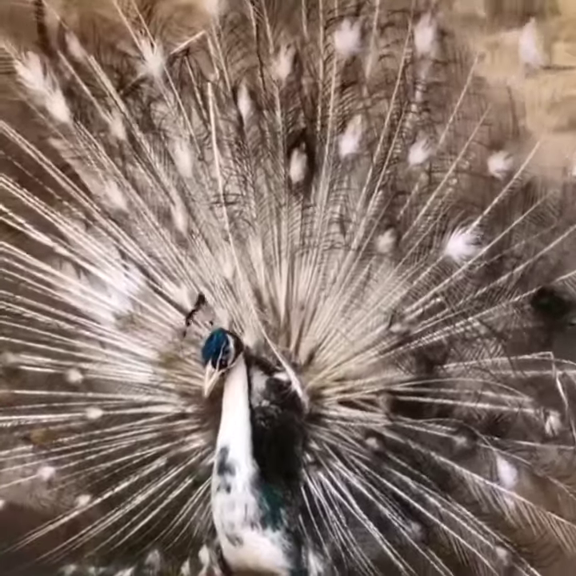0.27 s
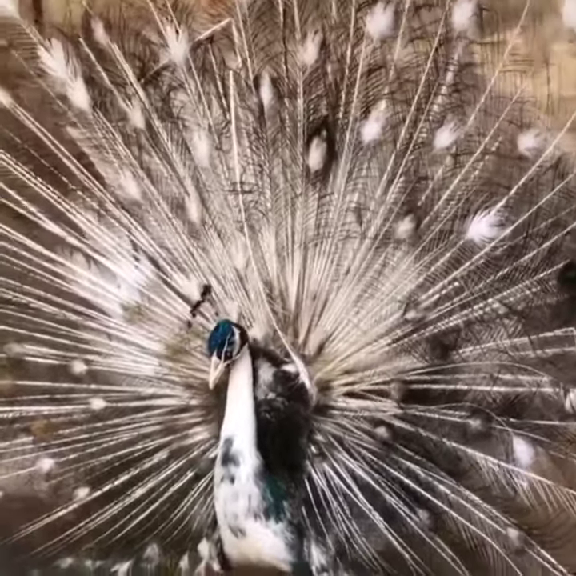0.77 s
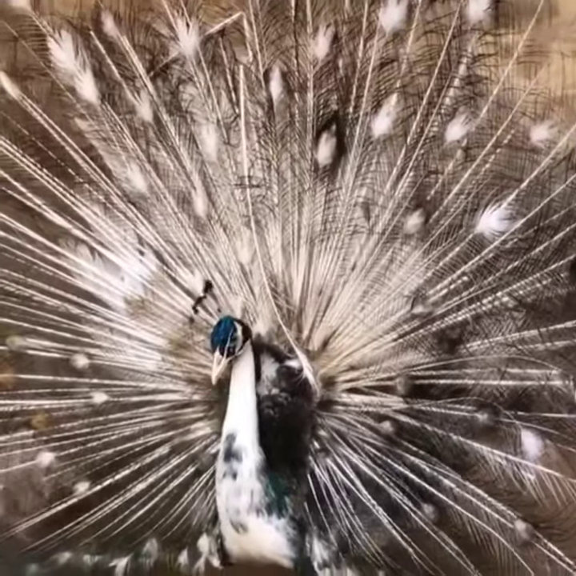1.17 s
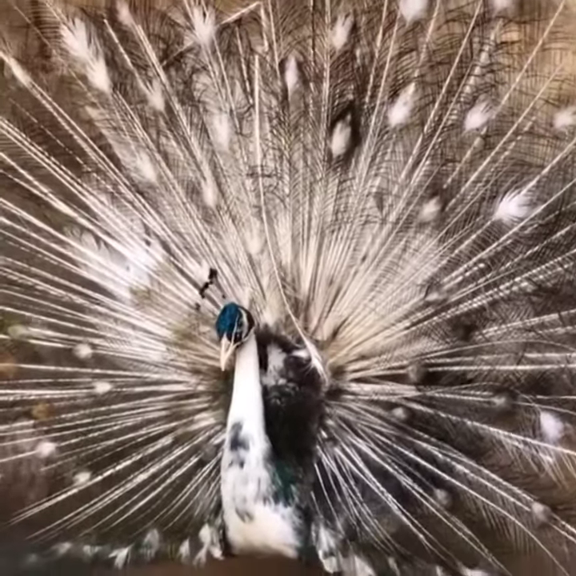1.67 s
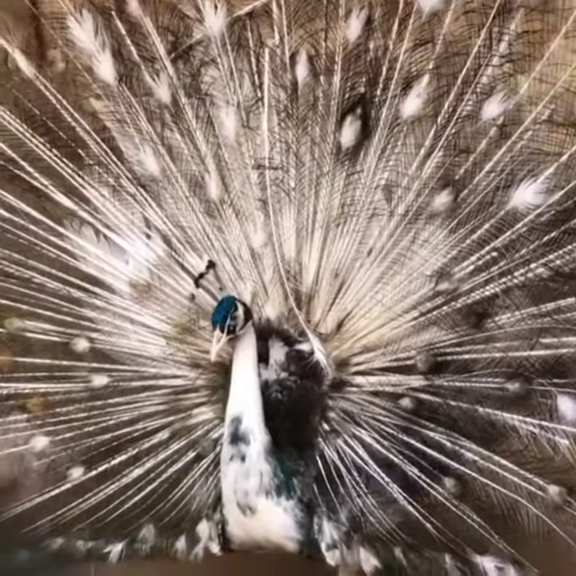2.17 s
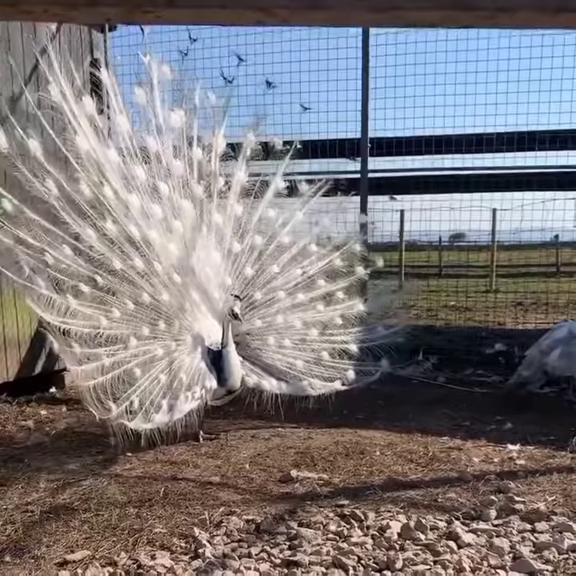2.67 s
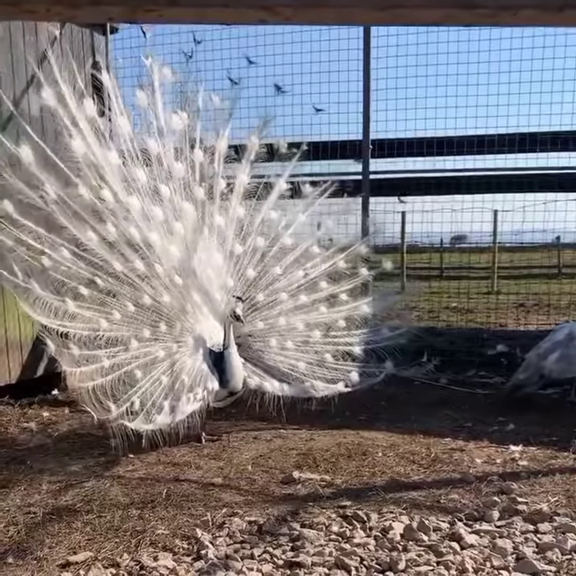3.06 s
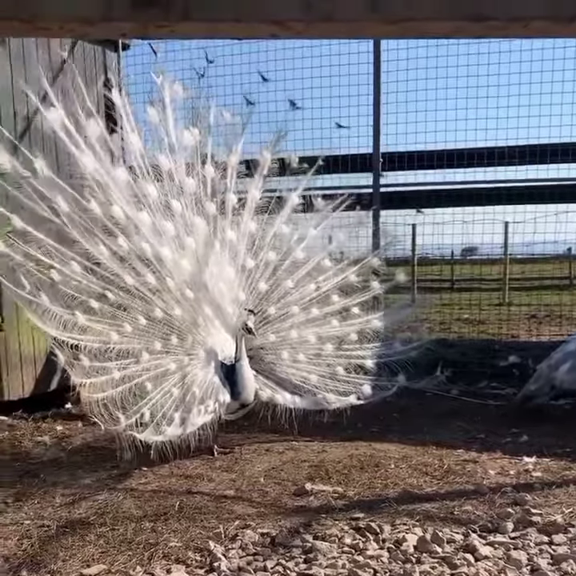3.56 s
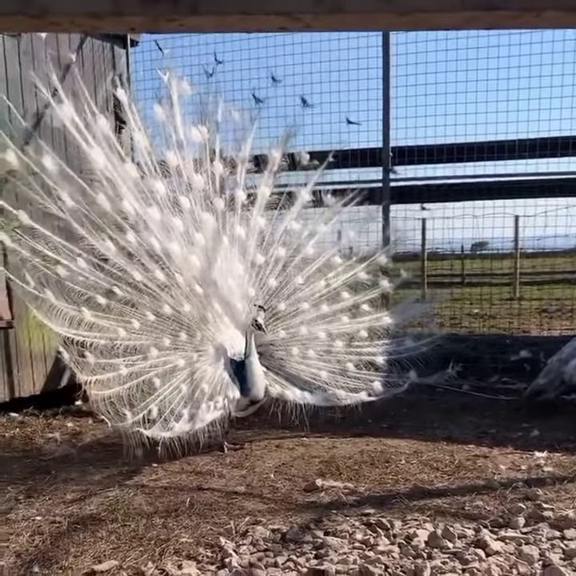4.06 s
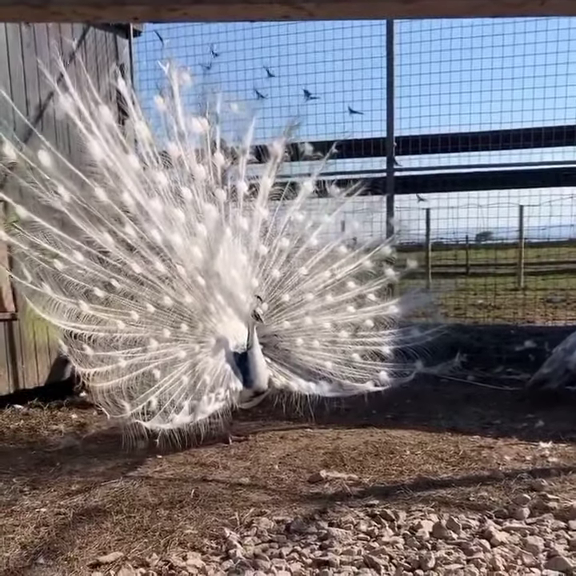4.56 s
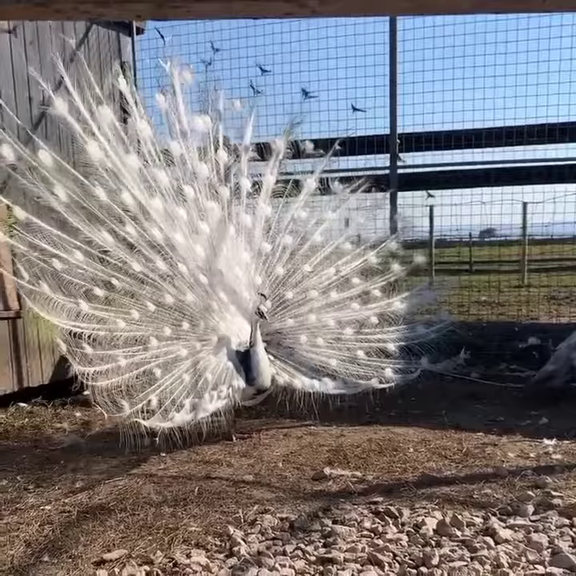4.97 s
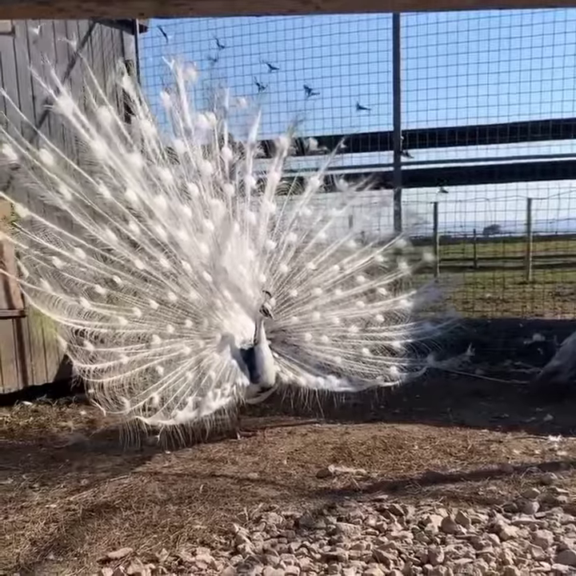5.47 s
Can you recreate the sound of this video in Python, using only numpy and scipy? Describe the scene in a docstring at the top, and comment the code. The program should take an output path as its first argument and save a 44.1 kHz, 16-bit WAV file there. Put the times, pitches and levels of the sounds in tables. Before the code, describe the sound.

First a busy mono bird yard: rough noise swelling, feathers shivering, honks and little twittering chirps with short echoes, a few thuds and ticks. An abrupt cut at about two and a half seconds brings a calmer stereo pen with soft wind, low hum and faint whistles. Fingers scuff and knock the handheld microphone, then peafowl wail, rising and falling with an echoing tail.

```python
"""Bird yard, two moments

A short silent gap joins them. First, in mono: wind rumble and yard noise, rustling feathers, thuds and a squawk
(all shaped noise), fowl honks (harmonics through a throat) and small birds (gliding sines). Then, in stereo and
quieter: a dying honk, a far motor hum (wavering lines), hands on the microphone (noise and ringing body modes)
and three peafowl meows, two syrinx voices through a long windpipe, that ring between the sheds."""
import sys
import numpy as np
from scipy import signal
from scipy.fft import rfft, irfft
from scipy.io import wavfile

SR = 44100
rng = np.random.default_rng(int(sys.argv[2]) if len(sys.argv) > 2 else 0)


def int16_out(signal):
    """Quantize to a 16-bit WAV file."""
    q = np.round(np.clip(np.atleast_2d(signal).T, -1, 1) * 32767)
    wavfile.write(sys.argv[1], SR, q.astype(np.int16))


N = 252252
T = np.arange(N) / SR
FIRST_END_S, SECOND_START_S = 2.4708, 2.4918


def from_db(db):
    """Decibels to an amplitude factor."""
    return 10 ** (np.asarray(db) / 20)


def rms_one(x):
    """Scale to an rms of 1."""
    return x / np.sqrt(np.mean(x ** 2) + 1e-20)


def in_time(rows, t=T):
    """Join the rows of a table by straight lines in time; one curve per column after the time."""
    times, *columns = np.transpose(rows)
    return [np.interp(t, times, column) for column in columns]


def at_hz(points, hz):
    """Read a (frequency, level) table on a logarithmic frequency axis."""
    table_hz, table_db = np.array(points).T
    return np.interp(np.log(np.maximum(hz, 1)), np.log(table_hz), table_db)


def coloured(x, points, turn=1):
    """Filter by a (frequency, level) spectrum; a complex turn rotates the phase."""
    gain = from_db(at_hz(points, np.fft.rfftfreq(N, 1 / SR)))
    return irfft(rfft(x) * turn * gain, N)


def noise(points):
    """Noise with the given spectrum, scaled to an rms of 1."""
    return rms_one(coloured(rng.standard_normal(N), points))


def drift(hz, size=N):
    """Random wandering of spread 1: noise through two equal low-pass poles at hz."""
    r = np.exp(-2 * np.pi * hz / SR)
    settled = signal.lfilter([1], [1, -2 * r, r * r], rng.standard_normal(size + 4000))[4000:]
    return rms_one(settled)


def add(out, s, sound):
    """Place a sound at s seconds."""
    i = round(s * SR)
    out[i:i + len(sound)] += sound[:N - i]


def bursts(rows, order=3):
    """Band-limited noise bursts that start fast and die exponentially."""
    out, t = np.zeros(N), T[:SR // 4]
    for s, level_db, low_hz, high_hz, t60 in rows:
        band = signal.butter(order, [low_hz, high_hz], "band", fs=SR, output="sos")
        burst = rms_one(signal.sosfilt(band, rng.standard_normal(len(t))))
        onset = np.clip(t / t60 / 0.11, 0, 1)
        add(out, s, from_db(level_db - 60 * t / t60) * burst * onset)
    return out


def swelling_mode(peak_db, hz, rise, sharpness):
    """A sine that swells to its peak after rise seconds, then dies; it first moves downwards."""
    t = T[:SR // 4]
    shape = (t / rise * np.exp(1 - t / rise)) ** sharpness
    return -from_db(peak_db) * shape * np.sin(2 * np.pi * hz * t)


# wind rumble spectra of the two moments: (frequency [Hz], relative level [dB per Hz])
RUMBLE_1 = [(8.8, -52), (15, -13), (48, 2.5), (67, -5), (107, -13.5), (180, -18), (269, -27), (400, -39),
            (520, -78), (880, -120)]
RUMBLE_2 = [(8.8, -63), (15, -38.5), (41, 2), (103, 6.5), (188, -12.5), (207, -16.5), (280, -19.5),
            (326, -33.5), (400, -25.5), (520, -33.5), (880, -120)]
# wind rumble in the second moment, before gusts: (time [s], level [dB])
WIND_2 = [(2.5, -54), (2.55, -50), (2.97, -50), (3.07, -41), (3.15, -56), (3.33, -48), (3.85, -57.5),
          (4.3, -52), (4.7, -56), (5.05, -50), (5.41, -52), (5.72, -54.5)]
WIND_1_DB, GUST_SPREAD_DB, GUST_RATE_HZ = -45.5, 2, 8


def wind():
    """Low noise whose level wanders with chance gusts; one rumble for each moment."""
    gust_db = GUST_SPREAD_DB * drift(GUST_RATE_HZ)
    first = from_db(WIND_1_DB + gust_db) * noise(RUMBLE_1)
    second = from_db(in_time(WIND_2)[0] + gust_db) * noise(RUMBLE_2)
    return first, second


# feather rustle, before its flicker: (time [s], level [dB])
SHIVER = [(0.0, -59), (0.1, -61.5), (0.72, -63), (1.09, -67.5), (1.12, -58), (1.2, -68.5), (1.33, -61.5),
          (1.35, -66), (1.61, -63.5), (1.71, -69.5), (1.75, -62), (1.9, -67), (1.95, -63), (2.16, -67),
          (2.17, -64), (2.36, -65.5), (2.41, -66.5), (2.46, -66)]
# yard noise, before it swells and wanders: (time [s], level [dB])
YARD_LEVEL = [(0, -56), (.4, -56.5), (.7, -52), (1.0, -55.5), (1.3, -52.5), (1.55, -57), (1.9, -50),
              (2.2, -57), (2.46, -55.5)]
# yard noise spectrum in the first moment: (frequency [Hz], relative level [dB])
YARD_1 = [(88, -2), (150, 2.5), (190, -1), (530, -12), (912, -16), (1400, -14), (2260, -17.5),
          (2990, -17.5), (5000, -36), (6500, -58), (11000, -120)]
YARD_FOLLOWS, YARD_PATCHY_DB = 0.32, 1.5   # share of the rustle's swell in dB; spread of the wandering


def yard():
    """Yard noise that swells with the rustle and wanders by chance."""
    rustle_db = in_time(SHIVER)[0]
    swell_db = YARD_FOLLOWS * (rustle_db - rustle_db[T < FIRST_END_S].mean())
    level_db = in_time(YARD_LEVEL)[0] + swell_db + YARD_PATCHY_DB * drift(9.3)
    return from_db(level_db) * noise(YARD_1)


# yard floor spectrum in the second moment: (frequency [Hz], relative level [dB])
YARD_2 = [(200, -4), (300, 0.5), (400, -14.5), (700, -11.5), (1200, -19.5), (1700, -24.5), (2400, -29),
          (4000, -28.5), (5200, -33.5), (6800, -26), (9000, -34.5), (11000, -35.5), (14700, -35.5)]
YARD_2_DB = -73


def yard_floor():
    """Two independent steady noises, one for the mid and one for the side."""
    return from_db(YARD_2_DB) * np.array([noise(YARD_2), noise(YARD_2)])


# far motor lines, before they waver: (frequency [Hz], rms level [dB])
HUM = [(91.5, -61), (183.0, -71.5), (204.6, -76.5), (274.5, -78.5), (366.1, -85)]


def hum():
    """Far motor: steady-pitched lines that each waver slowly in level."""
    return sum(np.sqrt(2) * from_db(db + 4.1 * drift(6)) * np.sin(2 * np.pi * hz * T) for hz, db in HUM)


# noise bursts in the yard: low thuds and, at .887 s, one hoarse high squawk: (time [s], level before decay
# [dB], low edge [Hz], high edge [Hz], t60 [s])
THUDS_AND_SQUAWK = [(.07, -42.5, 248, 1230, .11), (.887, -48, 2680, 3400, .4), (1.27, -47, 497, 2200, 0.27),
                    (1.295, -35, 178, 1060, 0.15), (1.824, -37, 344, 1140, 0.12)]
# sharp ticks, same columns: (time [s], level before decay [dB], low edge [Hz], high edge [Hz], t60 [s])
TICKS = [(1.534, -49, 2500, 8850, .018), (2.268, -35.5, 300, 4200, 0.011), (2.349, -42, 6000, 13000, .006)]


def thuds_and_ticks():
    """Noise bursts; a gentler filter slope keeps the ticks broad."""
    return bursts(THUDS_AND_SQUAWK) + bursts(TICKS, order=1)


# feather rustle spectrum: (frequency [Hz], relative level [dB])
RUSTLE = [(2060, -35), (3500, -6.5), (4870, -8), (6540, -8), (9730, -11.5), (10500, -13.5), (12100, -12.5),
          (13800, -13.5), (14200, -32), (14700, -45)]


def rustle():
    """Tail feathers: high noise that follows the shiver and flickers fast."""
    return from_db(in_time(SHIVER)[0] + 1.06 * drift(53)) * noise(RUSTLE)


# a hand rubs the microphone body, before its flicker: (time [s], level [dB])
RUBBING = [(2.55, -84), (2.7, -72), (2.92, -63), (3.04, -66.5), (3.09, -92.5), (3.2, -73.5), (3.3, -79.5),
           (3.4, -117.5)]
# its spectrum: (frequency [Hz], relative level [dB per Hz])
RUB_TONE = [(300, -30), (500, -10), (720, 0.5), (950, -17.5), (1200, -22.5), (2000, -49.5)]


def rubbing():
    """Mid-band noise whose level flickers as the hand rubs."""
    return from_db(in_time(RUBBING)[0] + 0.83 * drift(23)) * noise(RUB_TONE)


# fingers scuff the microphone body: (time [s], level before decay [dB], t60 [s])
SCUFFS = [(2.639, -57, 0.061), (2.89, -58, 0.075), (3.17, -60, 0.23), (3.264, -50, .21), (3.91, -53.5, .1),
          (5.275, -62, 0.34)]
SCUFF_LOW_HZ, SCUFF_HIGH_HZ = 556, 940


def scuffs():
    """Short noise bursts, all in one narrow band."""
    return bursts([(s, db, SCUFF_LOW_HZ, SCUFF_HIGH_HZ, t60) for s, db, t60 in SCUFFS])


# knocks on the microphone body: (time [s], reference peak [dB])
KNOCKS = [(3.30125, -13), (3.9047, -47)]
# modes of the body: (frequency [Hz], peak against the knock [dB], rise [s], sharpness of the swell [1])
BODY = [(695, -1.5, 0.0034, 6.2), (427, -12.5, 0.0037, 4.9), (217, -16.5, 0.0064, 6.1),
        (74.6, -38.5, 0.0087, 2.5)]
# first touch of a knock: (level against the knock, before decay [dB], low edge [Hz], high edge [Hz])
CRACK = [(-24, 1000, 1920), (-43, 3200, 3640), (-43.5, 6030, 7100)]
CRACK_LEAD_S, CRACK_T60_S = .004, 0.015


def knocks():
    """A crack of noise at first touch, then a soft contact swells the body modes, which die away."""
    out, cracks = np.zeros(N), []
    for s, db in KNOCKS:
        for hz, mode_db, rise, sharpness in BODY:
            add(out, s, swelling_mode(db + mode_db, hz, rise, sharpness))
        for band_db, low_hz, high_hz in CRACK:
            cracks.append((s - CRACK_LEAD_S, db + band_db, low_hz, high_hz, CRACK_T60_S))
    return out + bursts(cracks)


# one gust thumps the membrane: (time [s], peak [dB], frequency [Hz], rise [s], sharpness of the swell [1])
WIND_BUMP = (3.013, -38, 62, 0.1, 5)


def wind_bump():
    """A single low mode that swells and dies."""
    out = np.zeros(N)
    s, *mode = WIND_BUMP
    add(out, s, swelling_mode(*mode))
    return out


# sharp clicks after the gap: (time [s], step [dB])
CLICKS = [(2.4921, -42), (2.4954, -40), (2.5051, -38)]


def clicks():
    """Downward steps that leak away within a few milliseconds."""
    out = np.zeros(N)
    for s, step_db in CLICKS:
        add(out, s, -from_db(step_db) * np.exp(-T[:SR // 4] / 0.00036))
    return out


def swell(length):
    """Quick onset, softer end."""
    x = np.linspace(0, 1, int(length * SR))
    return np.clip(x / .12, 0, 1) * np.clip((1 - x) / 0.29, 0, 1)


# small birds: (time [s], length [s], start pitch [Hz], end pitch [Hz], level before placing [dB])
CHIRPS = [(.0, 0.042, 2500, 2453, -59.5), (0.043, .049, 3050, 2316, -56), (.231, 0.019, 3000, 3000, -61.5),
          (0.326, 0.075, 3250, 2930, -66), (.48, .028, 2950, 2900, -59.5), (0.505, 0.056, 3400, 3610, -63),
          (.598, 0.051, 1900, 1825, -59), (.885, 0.024, 2550, 2580, -55), (0.895, 0.047, 3310, 3250, -53),
          (1.365, 0.059, 2950, 2590, -64), (1.431, .065, 2950, 2620, -63.5), (1.538, 0.04, 3300, 3350, -62),
          (1.569, 0.087, 3100, 2550, -60), (1.694, 0.047, 3100, 2430, -58),
          (1.88, 0.0615, 2850, 2434, -60.5), (1.893, 0.045, 3900, 3880, -63.5),
          (1.926, 0.023, 3200, 3200, -57), (2.043, 0.073, 3550, 3900, -60.5),
          (2.088, .028, 2800, 2640, -54.5), (2.204, 0.064, 4050, 4210, -63),
          (2.258, 0.082, 3250, 2500, -55.5), (2.39, 0.08, 4190, 4410, -65.5),
          (2.505, 0.092, 2480, 2470, -72.5), (2.702, 0.15, 1820, 2080, -86.5),
          (2.724, .12, 2400, 2476, -85.5), (2.909, 0.078, 2250, 1720, -88),
          (2.963, 0.081, 1760, 2196, -83.5), (3.691, .15, 2360, 2304, -88), (3.86, 0.2, 1800, 1724, -91.5)]
# hoarse chatter until CHATTER_END_S, then clearer whistles; jitter as a share of pitch
CHATTER_END_S, CHATTER_JITTER, WHISTLE_JITTER = 2.4, 0.0448, .016


def small_birds():
    """Gliding sines; fast pitch jitter makes the early ones hoarse."""
    out = np.zeros(N)
    for s, length, hz, end_hz, level_db in CHIRPS:
        shape = swell(length)
        jitter = CHATTER_JITTER if s < CHATTER_END_S else WHISTLE_JITTER
        pitch = np.linspace(hz, end_hz, len(shape)) * (1 + jitter * drift(255, size=len(shape)))
        whistle = np.sin(2 * np.pi * np.cumsum(pitch) / SR)
        add(out, s, np.sqrt(2) * from_db(level_db) * shape * whistle)
    return out


def resonances(modes, hz):
    """Summed gain of steep resonance peaks at the given frequencies."""
    return sum(from_db(db) / (1 + (2 * (hz - centre_hz) / width_hz) ** 2) ** 1.5
               for centre_hz, width_hz, db in modes)


def voice(hz, level_db, low_db, middle_db, top_db, rough, throat, wobble=0, shift=0):
    """Harmonics of a wavering, jittering syrinx through the throat; shift raises the resonances in percent."""
    size = len(hz)
    waver = .0025 * drift(20, size=size)
    jitter = 0.138 * rough * drift(200, size=size)
    phase = 2 * np.pi * np.cumsum(hz * (1 + waver + jitter)) / SR + wobble
    # the second harmonic carries the level; the higher ones flicker
    out = from_db(low_db) * np.sin(phase) + np.sin(2 * phase)
    for k in range(3, 15):
        gain = from_db((middle_db if k < 6 else top_db) + 3.5 * drift(25, size=size))
        throat_gain = resonances(throat, k * hz / (1 + shift / 100))
        out += gain * throat_gain * np.sin(k * phase + k * k)
    return np.sqrt(2) * from_db(level_db) * out


# fowl honks; the last already sounds when the second moment opens:
# (time [s], length [s], start pitch [Hz], end pitch [Hz], second-harmonic level [dB], hoarseness [0-1])
HONKS = [(.16, .052, 602, 602, -63, .55), (.495, .078, 537, 567, -58, 0.49),
         (.49, 0.033, 748, 752, -58.5, 0.76), (.62, 0.052, 506, 538.5, -59, 0.64),
         (.73, 0.05, 542, 536.4, -49, 0.5), (.94, 0.038, 516, 555, -60.5, 0.34),
         (1.11, .045, 536, 514, -64.5, 0.18), (1.685, 0.066, 814, 730, -56.5, 0.65),
         (1.72, 0.0415, 510, 500, -48.5, 0.22), (1.83, 0.061, 467, 563, -56.5, 0.64),
         (1.93, 0.066, 507.6, 501.4, -41, 0.13), (1.995, 0.095, 507.7, 495.2, -54.5, .19),
         (2.44, 0.13, 587.5, 511, -50, 0.38)]
# throat resonances: (frequency [Hz], width [Hz], gain [dB])
FOWL_THROAT = [(1572, 180, -9.5), (2070, 560, -18), (2450, 180, -13.5), (3450, 800, -33.5),
               (3840, 1240, -20.5)]
HONK_FUNDAMENTAL_DB, HONK_BRIGHT_DB, BRIGHT_DB_PER_HOARSE = -5.5, -6.5, 23   # hoarse honks are brighter
LAST_HONK_DULL_DB = -18   # it comes from further off


def fowl(honks, dull_db):
    """Short nasal honks with a rasp; dull_db offsets the upper harmonics."""
    out = np.zeros(N)
    for s, length, hz, end_hz, level_db, rough in honks:
        shape = swell(length)
        rasp = 1 + .3 * drift(120, size=len(shape))
        bright_db = HONK_BRIGHT_DB + BRIGHT_DB_PER_HOARSE * rough + dull_db
        pitch = np.linspace(hz, end_hz, len(shape))
        sound = voice(pitch, level_db, HONK_FUNDAMENTAL_DB, bright_db, bright_db, rough, FOWL_THROAT)
        add(out, s, shape * rasp * sound)
    return out


# peafowl meows, one list each:
# (time [s], pitch [Hz], second-harmonic level [dB], middle overtones [dB], top overtones [dB])
MEOWS = [
    [(3.975, 457, -91, -16, -21), (4.0, 494, -59.5, -9, -24), (4.07, 547.6, -64.5, 13, -0.5),
     (4.16, 577.7, -48, -14.5, -16.5), (4.24, 600.2, -48, -10.5, -11), (4.36, 577.4, -51.5, -16, -19.5),
     (4.45, 537.2, -53, -18, -17.5), (4.58, 492, -56.5, -3.5, -9), (4.7, 447, -77, -3, -27)],
    [(4.5, 529.5, -70.5, 2, 0), (4.64, 589, -65.5, 12, 16), (4.74, 615, -60, 9, 8.5),
     (4.8, 629.3, -54.5, -6.5, 8), (4.86, 591.6, -56.5, -12, -6), (4.97, 551.4, -55.5, -12, -0.5),
     (5.12, 500.5, -63, -1, -2), (5.24, 491, -69, -18, 2.5), (5.3, 500.2, -74.5, 1.5, -25),
     (5.37, 503, -92, -3, -20)],
    [(5.533, 493, -77, -15, -20), (5.543, 514.5, -69, 8, -13), (5.6, 499, -67.5, 15, -10),
     (5.64, 560, -65, 6, 6), (5.68, 587, -58.5, 6, 3.5), (5.72, 591.4, -53.5, 1, 2.5)],
]
# manner of each meow:
# (neck shortening at start [%], at end [%], fundamental offset [dB], depth of the second voice [0-1])
MEOW_MANNER = [(2.3, -2, .1, 0.46), (1.05, 6, -3.5, 0.65), (2.6, 1.7, 7, .1)]
# fundamental against the second harmonic, before that offset: (pitch [Hz], level [dB])
FUNDAMENTAL = [(470, 0), (520, 0.5), (565, -8.5), (600, -2), (630, 2.5)]
# resonances of the long windpipe, nearly evenly spaced: (frequency [Hz], width [Hz], gain [dB])
PEAFOWL_THROAT = [(1607, 480, -12), (2320, 131, -6), (2795, 270, -14.5), (3270, 830, -18.5),
                  (4052, 186, -13.5), (4537, 100, -15.5), (5190, 840, -23), (5863, 180, -14.5),
                  (6380, 410, -26), (7370, 1200, -43)]
SECOND_VOICE_HZ = 411.5   # the other side of the syrinx; it beats against the main pitch
SPLIT_HZ, SPLIT_WIDTH_HZ = 543, 37   # on the fall the second voice joins in as the pitch passes here
MEOW_ROUGH, SPLIT_ROUGH = .03, 0.023   # roughness, and what the second voice adds


def peafowl():
    """Rising and falling meows; on the fall the second voice modulates the first and splits its lines."""
    out = np.zeros(N)
    for meow, (neck, neck_end, low_db, split) in zip(MEOWS, MEOW_MANNER):
        t = np.arange(meow[0][0], meow[-1][0], 1 / SR)
        hz, level_db, middle_db, top_db = in_time(meow, t)
        falling = t > t[np.argmax(hz)]
        depth = np.clip(split, 0, 1) * falling * np.exp(-((hz - SPLIT_HZ) / SPLIT_WIDTH_HZ) ** 2)
        beat = depth * np.cos(2 * np.pi * np.cumsum(hz - SECOND_VOICE_HZ) / SR)
        sound = voice(hz, level_db, low_db + at_hz(FUNDAMENTAL, hz), middle_db, top_db,
                      MEOW_ROUGH + SPLIT_ROUGH * depth, PEAFOWL_THROAT,
                      wobble=0.35 * beat, shift=np.linspace(neck, neck_end, len(t)))
        add(out, t[0], sound * (1 + 0.94 * beat))
    return out


# tone of the reflections: (frequency [Hz], gain [dB])
ECHO_TONE = [(300, 8.5), (600, -5.5), (1100, 4.5), (2000, 5), (4000, -5), (8000, -4.5)]
# reverberation times, and levels before the echo tone
YARD_T60_S, YARD_WET_DB = .36, -2.5
SHED_T60_S, SHED_WET_DB, SHED_SIDE_WET_DB = 0.64, -4, -4.5


def echoes(x, t60, wet_db):
    """Scattered reflections from sheds and fences, uneven in strength, dying away."""
    t = np.arange(int(SR * .9)) / SR
    tail_db = 1.9 * drift(34, size=len(t)) - 60 * t / t60
    tail = rng.standard_normal(len(t)) * from_db(tail_db) * np.clip(t / .01, 0, 1)
    tail /= np.sqrt(np.sum(tail ** 2))
    return from_db(wet_db) * coloured(signal.fftconvolve(x, tail)[:N], ECHO_TONE)


def first_moment(wind_1, chirps):
    """The mono yard with its birds and their echoes, low-passed below 14.3 kHz."""
    birds = fowl(HONKS[:-1], dull_db=-0.5) + chirps
    sound = wind_1 + yard() + rustle() + thuds_and_ticks()
    sound += birds + echoes(birds, YARD_T60_S, YARD_WET_DB)
    return signal.sosfilt(signal.cheby2(10, 40, 14300, fs=SR, output="sos"), sound)


# two microphone ports, side against mid: (frequency [Hz], gain [dB])
SIDE_GAIN = [(60, -81.5), (110, -79.5), (200, -60), (370, -69.5), (680, -38.5), (1250, -1.5), (2310, 6),
             (4230, 2.5), (7780, 1), (14300, -0.5)]


def second_moment(wind_2, chirps):
    """Calls, echoes and hands on two microphone ports, as mid plus and minus side."""
    calls = peafowl() + fowl(HONKS[-1:], LAST_HONK_DULL_DB) + chirps * (T >= SECOND_START_S)
    near = scuffs() + knocks() + wind_bump() + clicks() + rubbing()
    floor = yard_floor()
    # the small birds sit off to the side and are fainter in the middle
    mid = calls - 0.38 * chirps + echoes(calls, SHED_T60_S, SHED_WET_DB)
    mid += near + floor[0] + wind_2 + hum()
    # direct sound reaches the left port first (a quarter-cycle turn); echoes and floor differ between ports
    direct = coloured(calls + 0.74 * near, SIDE_GAIN, turn=1j)
    diffuse = coloured(echoes(calls, SHED_T60_S, SHED_SIDE_WET_DB) + floor[1], SIDE_GAIN)
    return mid + (direct + diffuse) * [[1], [-1]]


def scene():
    """The two moments in turn, with silence in the gap between them."""
    wind_1, wind_2 = wind()
    chirps = small_birds()
    first = first_moment(wind_1, chirps)
    second = second_moment(wind_2, chirps)
    return first * (T < FIRST_END_S) + second * (T >= SECOND_START_S)


def record(dry):
    """A steep low-pass removes what lies above 16 kHz."""
    return signal.sosfilt(signal.cheby2(12, 60, 16000, fs=SR, output="sos"), dry)


dry = scene()
out = record(dry)
int16_out(out)
```